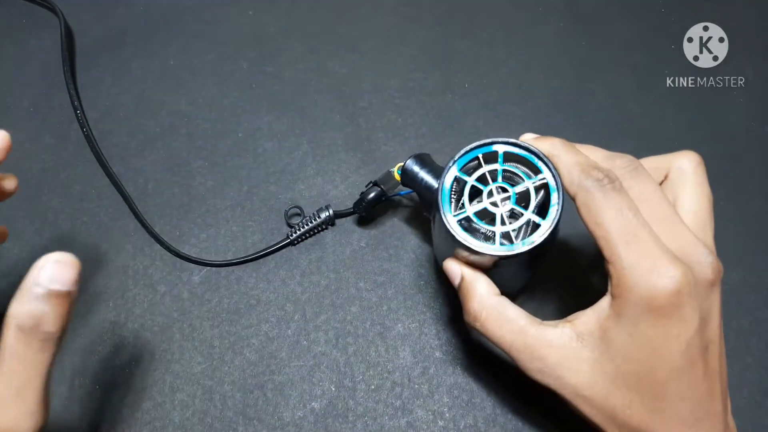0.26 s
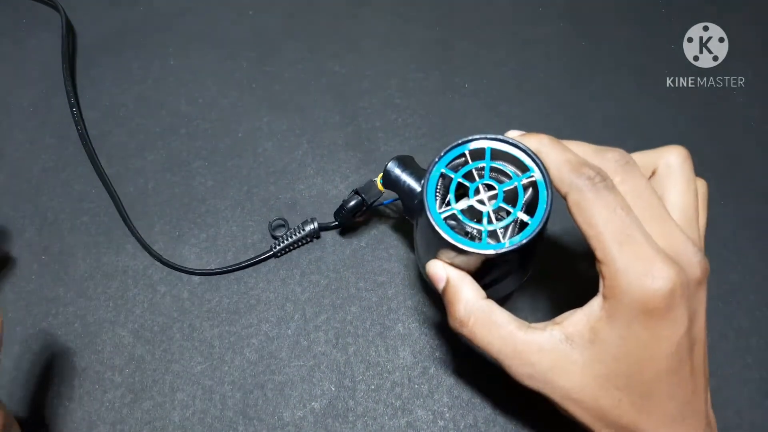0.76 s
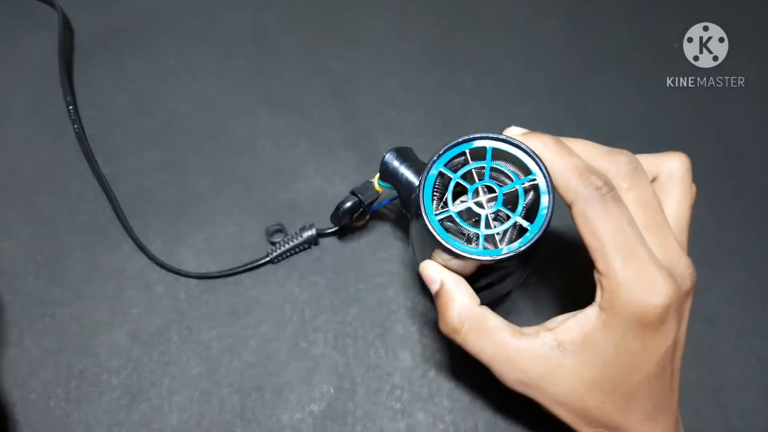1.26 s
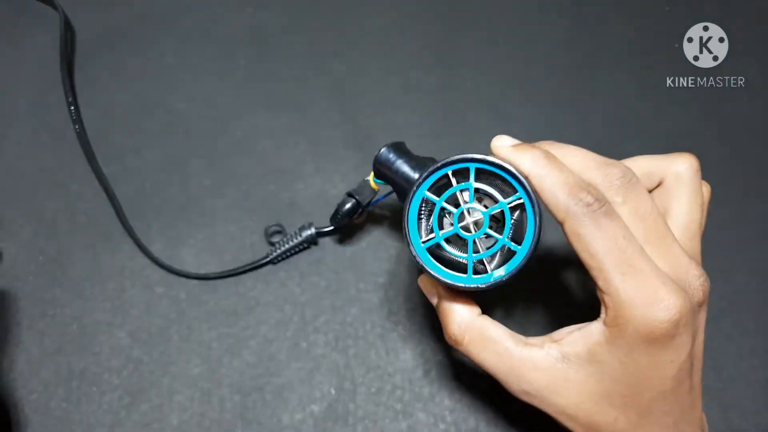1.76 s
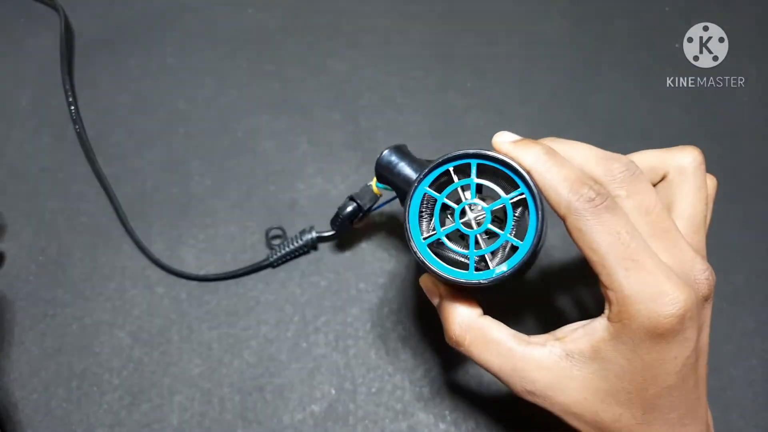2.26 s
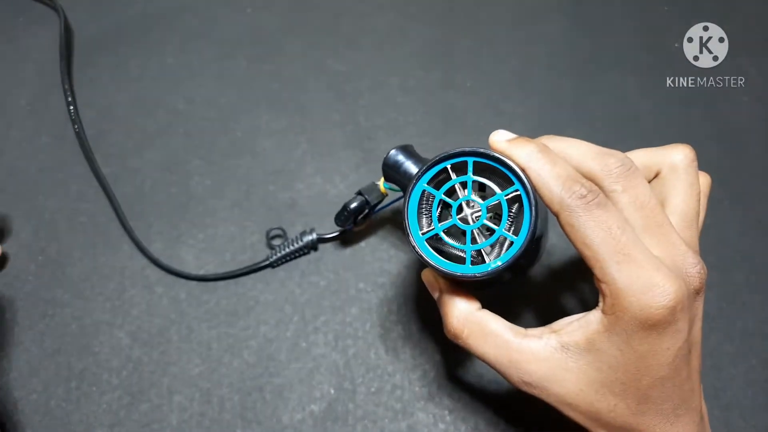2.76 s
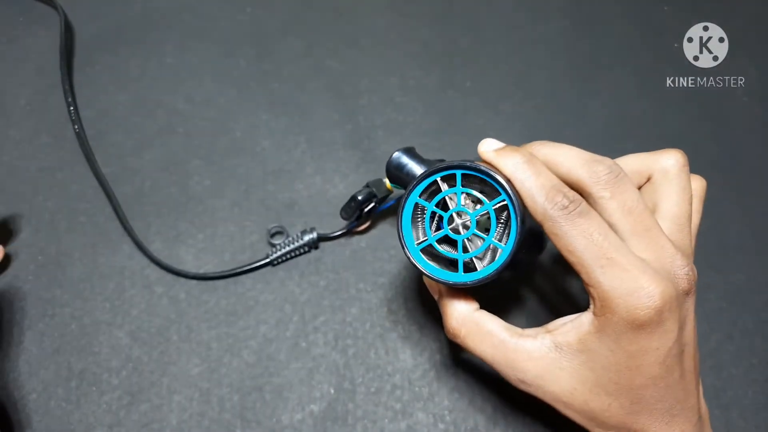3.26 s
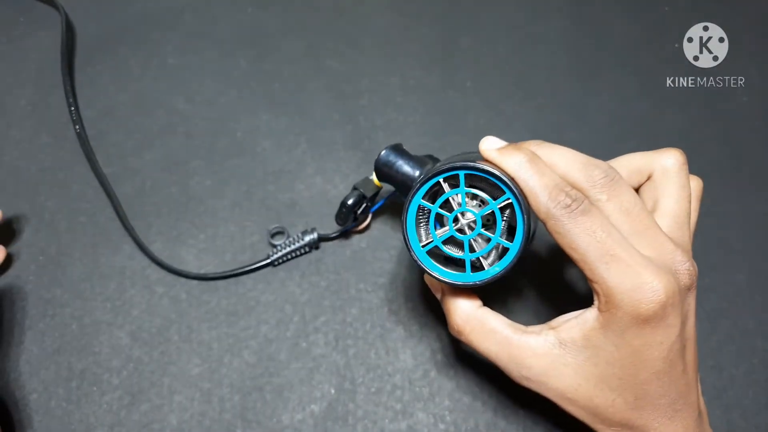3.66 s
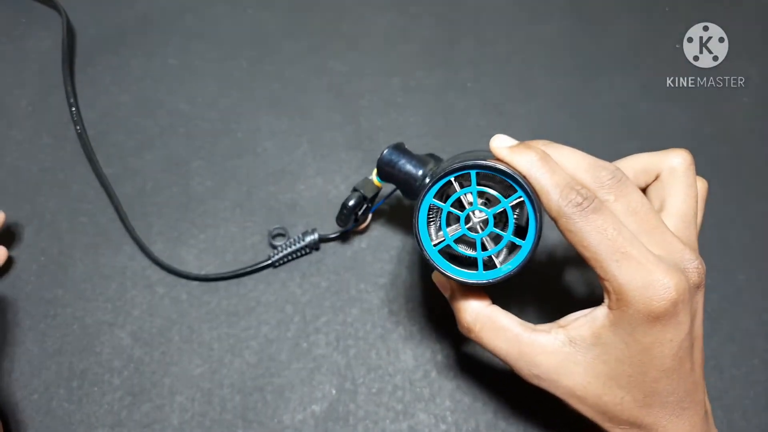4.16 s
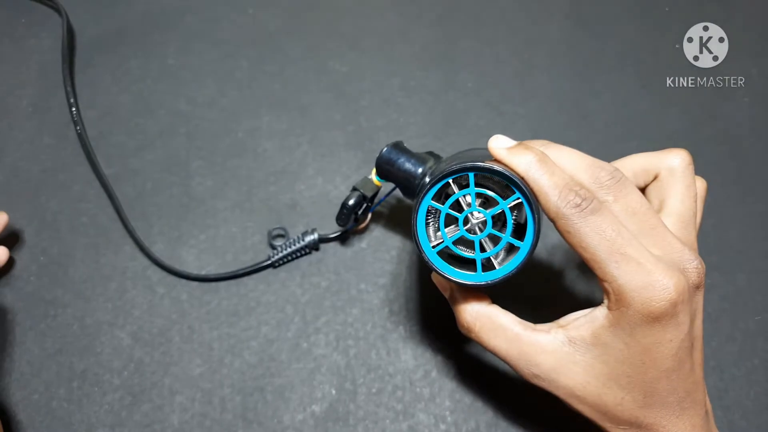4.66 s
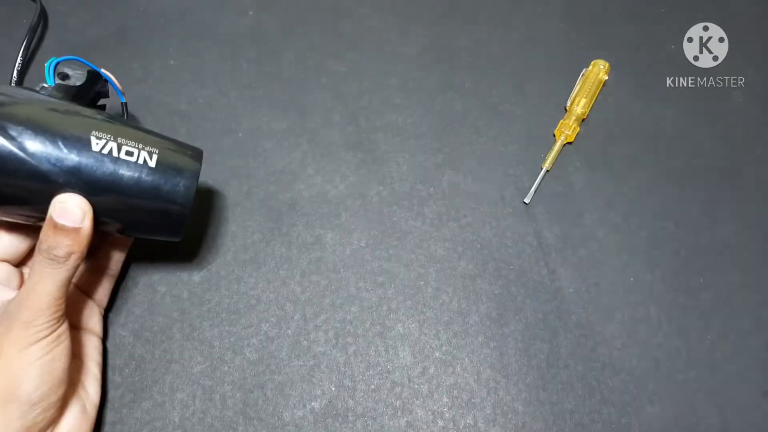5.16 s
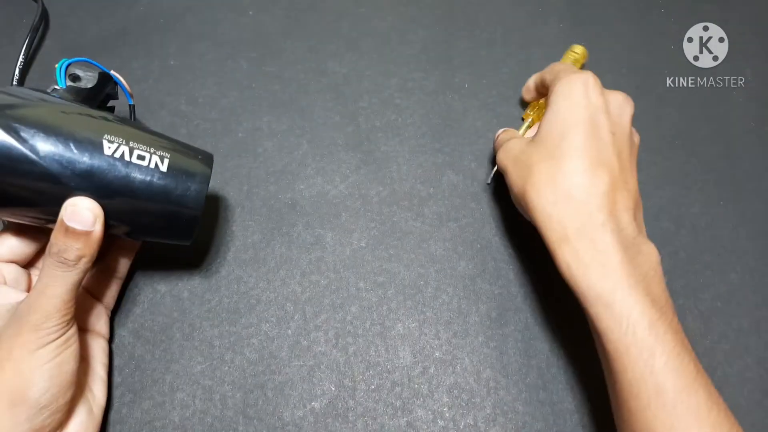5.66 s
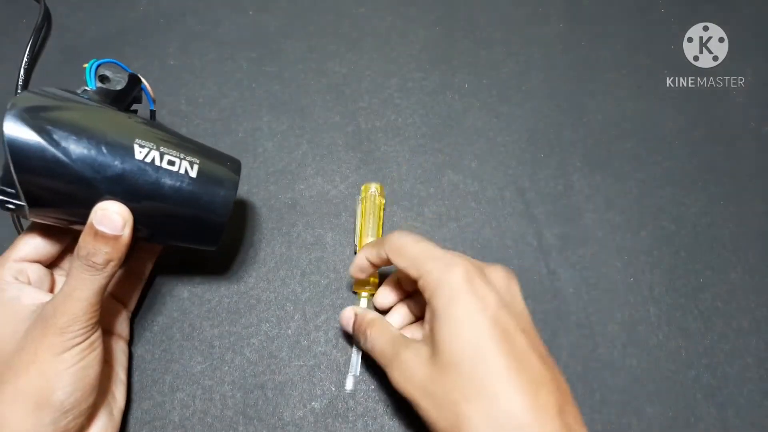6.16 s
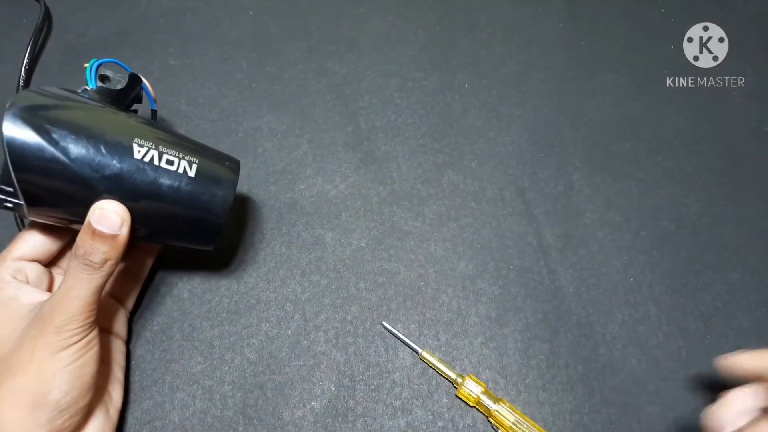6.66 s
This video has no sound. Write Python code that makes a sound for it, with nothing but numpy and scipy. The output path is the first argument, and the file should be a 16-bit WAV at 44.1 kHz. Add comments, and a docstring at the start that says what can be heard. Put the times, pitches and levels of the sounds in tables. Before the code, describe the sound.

A small hair dryer hisses with a faint whine, its jet roaring in blustery left-sided microphone buffeting, then abruptly runs closer and brighter with a soft bump.

```python
"""Brief thumps and gusts strike the left channel, then air hisses over a faint shaft hum and fan whine. A small
hair dryer runs close to a phone: noise shaped by barrel resonances, with tones locked to the fan speed. Stood
nozzle up, it tilts until its jet buffets the left microphone port, and the gain control pulls all down; midway
the jet drifts aside, so that only its flapping edge hits in gusts, then it returns. Then the scene changes: the
dryer lies on its side, nearer and brighter, while a screwdriver bumps softly on the table."""
import sys
import numpy as np
from scipy import signal
from scipy.fft import rfft, irfft, next_fast_len
from scipy.io import wavfile
from scipy.ndimage import uniform_filter1d, minimum_filter1d, map_coordinates

SR = 44100
rng = np.random.default_rng(int(sys.argv[2]) if len(sys.argv) > 2 else 0)


def materialize(psi):
    """Save the field psi as 16-bit PCM at rate SR to the path in sys.argv[1].

    A 1-D psi becomes a single channel; in a 2-D psi each row is a channel.
    """
    bounded = np.clip(np.atleast_2d(psi).T, -1, 1)
    quanta = np.round(bounded * 32767).astype(np.int16)
    wavfile.write(sys.argv[1], SR, quanta)


N = 304731
TIME = np.arange(N) / SR
TURN_S = 5.177  # the scene changes here; from now on the dryer lies on its side

# Loudness of the dryer, nozzle up and on its side: (time [s], level [dB])
LOUDNESS_UPRIGHT = [(0, -38), (.35, -36.5), (1.1, -36.5), (1.6, -30), (2.2, -32), (4.9, -32), (5.17, -29.5)]
LOUDNESS_LYING = [(5.18, -20), (6.9, -23.5)]
# Rotation of the fan, which sags a little while upright: (time [s], speed [turns/s])
FAN_SPEED = [(0, 341.7), (1.4, 342.2), (3.3, 340.1), (5.17, 340.7), (5.18, 343.15)]
# Spectrum of the rushing air, relative to the loudness:
# (frequency [Hz], left level [dB per Hz], right level [dB per Hz])
AIR_UPRIGHT = [(40, -60, -67), (170, -51, -49), (284, -38, -40.5), (620, -40, -41.5), (834, -34, -37.5),
               (1235, -23.5, -25), (1960, -31, -31), (3360, -35, -37), (6330, -36, -40.5),
               (8400, -30, -39.5), (10260, -47, -40), (12300, -42, -38), (15300, -46.5, -45.5)]
AIR_LYING = [(40, -53.5, -59), (163, -45, -51.5), (274, -30, -32), (610, -34, -36.5), (1207, -16.5, -19.5),
             (1900, -27, -31), (3600, -31, -34), (6060, -32.5, -38.5), (8600, -29.5, -38.5),
             (10300, -43.5, -39.5), (12500, -38.5, -37.5), (15300, -46, -45)]
# Resonances and notches of barrel and table top:
# (centre [Hz], width [Hz], left gain [dB], right gain [dB])
BARREL_UPRIGHT = [(100, 25, 8, 8), (948, 39, 7.5, 5), (1044, 51, -7, -8), (1210, 50, 5.5, 0),
                  (1333, 130, 1, 7), (1470, 35, 12, 2), (1660, 110, -3.5, -7.5), (2500, 240, 9, 6),
                  (2760, 110, 2, 2), (3085, 155, 5.5, 4), (4030, 180, 6, 3), (4870, 450, 2, 4.5),
                  (7300, 360, 1.5, -2)]
BARREL_LYING = [(98, 15, 13, 20), (907, 42, -12, -7), (975, 74, 7, 5.5), (1041, 27, 9, -12),
                (1115, 120, 0.5, 4), (1328, 32, -7.5, -10), (1360, 51, 0, -2), (1697, 45, 6.5, -8),
                (2614, 106, 8.5, 3), (2804, 43, 10.5, 1), (2946, 94, 5, 5), (3370, 32, 7, -5),
                (4720, 210, 6, 3.5), (5330, 200, 2.5, 3), (8020, 45, 8, 5), (8560, 45, 5, 6)]
# Shaft hum and six-blade whine, relative to the loudness:
# (multiple of fan speed [1], left level [dB], right level [dB])
TONES_UPRIGHT = [(1, -12.5, -34), (6, -7.5, -9)]
TONES_LYING = [(1, -15.5, -17), (6, -10, -22)]
# Likeness of the air noise at the two ports: (frequency [Hz], coherence [1])
COHERENCE_UPRIGHT = [(100, .3), (300, .6), (800, 0.78), (1200, 0.58), (2300, 0.75), (3600, 0.34),
                     (8000, .33), (11000, 0.073)]
COHERENCE_LYING = [(100, 0.89), (400, 0.65), (1200, 0.51), (1900, 0.79), (2500, 0.083), (7000, 0.093),
                   (14000, .15)]

# Push of the jet on the left port, swinging on, half off, on again and away: (time [s], level [dB])
JET_PUSH = [(0, -21.5), (.25, -61), (1.1, -65), (1.55, -38.5), (1.67, -23.5), (1.695, 1), (1.95, 6),
            (2.35, 3.5), (2.6, -2.5), (3.1, -11.5), (3.37, -11.5), (3.62, 7), (4.5, 4), (4.96, 4),
            (5.06, -13), (5.13, -33)]
# Strongest gusts from the edge of the jet: (time [s], level [dB], half length [s])
EDGE_GUSTS = [(.081, -22, .006), (.206, -30, .006), (2.468, 7, 0.0037), (2.572, 2.5, 0.0054),
              (2.646, 5, 0.0067), (2.69, 5.5, .003), (2.777, 2, 0.0055), (2.859, 1, 0.011),
              (2.93, 2.5, 0.0063), (2.995, 0.5, 0.0082), (3.043, 1, 0.0032), (3.178, -3.5, 0.023),
              (3.327, -3, 0.0067), (3.454, 4, 0.0055), (5.044, -2.5, 0.013)]
# Relative spectra of the buffeting: deep body, splutter of the fastest eddies, and slow air
# curling round a port: (frequency [Hz], level [dB per Hz])
ROAR_SPECTRUM = [(20, -56), (42, -37.5), (65, -9.5), (90, -3.5), (130, -2.5), (170, -3), (240, 0.5),
                 (320, -5), (500, -8.5), (750, -18), (1200, -26.5), (2500, -77)]
SPLUTTER_SPECTRUM = [(150, -30), (400, -0.5), (700, -1), (1000, -5), (1500, -8.5), (2000, -15.5),
                     (3000, -29), (5000, -35.5), (10000, -70)]
DRAUGHT_SPECTRUM = [(25, -33), (55, 1), (85, -0.5), (130, -7.5), (300, -27), (900, -94)]
# Big lone eddies thumping the left port: (time [s], peak level [dB])
BIG_THUMPS = [(.013, -17), (.024, -8), (0.0278, -2), (1.6179, -1), (1.6376, -1)]

# Screwdriver bumping the table: (time [s], level [dB])
TABLE_BUMPS = [(6.22, -19.5), (6.285, -38)]
# Relative spectrum of the table's thud: (frequency [Hz], level [dB per Hz])
THUD_SPECTRUM = [(25, -25), (70, -1), (130, -2), (350, -1), (700, -8), (1500, -40)]


def dryer():
    """Superposition: air noise with its reflections plus fan tones, in two positions one after the other."""
    upright_air = air(AIR_UPRIGHT, BARREL_UPRIGHT, COHERENCE_UPRIGHT, lag_ms=0.043, flutter_db=0.25)
    upright = walls(upright_air) + fan(TONES_UPRIGHT, flicker_db=2)
    lying_air = air(AIR_LYING, BARREL_LYING, COHERENCE_LYING, lag_ms=0.316, flutter_db=0.39)
    lying = walls(lying_air) + fan(TONES_LYING, flicker_db=5)
    upright = amp(curve(LOUDNESS_UPRIGHT)) * upright
    lying = amp(curve(LOUDNESS_LYING)) * lying
    return np.where(TIME < TURN_S, upright, lying)


def air(spectrum, barrel, coherence, lag_ms, flutter_db):
    """Turbulence noise: broadband flow coloured by barrel resonance, reaching the left port first."""
    def port_response(hz):
        gain_db = np.array([along(spectrum, hz, axis=1), along(spectrum, hz, axis=2)])
        for centre, width, left_db, right_db in barrel:
            resonance = 1 / (1 + (2 * (hz - centre) / width) ** 2)
            gain_db = gain_db + np.outer([left_db, right_db], resonance)
        cycles_late = np.outer([0, lag_ms / 1000], hz)
        return amp(gain_db) * np.exp(-2j * np.pi * cycles_late) * np.sqrt(SR / 2)

    def mid_side_response(hz):
        # for mid + side and mid - side, the cosine of twice this angle is the coherence
        angle = np.arccos(np.clip(along(coherence, hz), 0, 1)) / 2
        return np.array([np.cos(angle), np.sin(angle)])

    mid, side = filtered(rng.standard_normal((2, N)), mid_side_response)
    flow = amp(flutter_db * (wobble(12) + wobble(90)))
    return flow * filtered(np.array([mid + side, mid - side]), port_response)


def fan(tones, flicker_db):
    """Rotor tones: shaft and blade-passing rates, their pitch and strength shaken by uneven inflow."""
    speed = curve(FAN_SPEED) * (1 + .0015 * wobble(40))
    angle = 2 * np.pi * np.cumsum(speed) / SR
    out = np.zeros((2, N))
    for multiple, left_db, right_db in tones:
        flicker = amp(flicker_db * wobble(32))
        tone = unit(np.sin(multiple * angle) * flicker)
        out += np.outer(amp([left_db, right_db]), tone)
    return out


def walls(x, wet_db=-11, t60=0.11):
    """Early reflection: quick echoes off the table and nearby walls ripple the spectrum."""
    age = TIME[:SR // 8]
    decay = amp(-60 * age / t60)  # t60 in seconds
    tail = rng.standard_normal((2, len(age))) * decay * (age > .002)
    tail /= np.linalg.norm(tail, axis=1, keepdims=True)
    return x + amp(wet_db) * signal.oaconvolve(x, tail, axes=1)[:, :N]


def push():
    """Shear-layer flapping: the jet is steady within and flaps at its edge, with gusts added in power."""
    edge_db, edge_breadth_db = -6, 8  # push at which the edge lies on the port
    flap_db, flap_knots_per_s = 3, 55
    jet_db = curve(JET_PUSH)
    on_edge = np.exp(-((jet_db - edge_db) / edge_breadth_db) ** 2)
    flow = amp(jet_db + flap_db * on_edge * wobble(flap_knots_per_s))
    gusts = sum(amp(db) ** 2 * swell(s, half_s) for s, db, half_s in EDGE_GUSTS)
    return 10 * np.log10(flow ** 2 + gusts)


def buffet(push_db, splutter_db=-14, roar_swing_db=1.92, splutter_swing_db=5.5, draught_db=-10):
    """Eddy scaling: a harder push on the ports breaks into smaller, brighter eddies."""
    swirl = unit(wobble(420) + 0.4 * wobble(90))
    roar = opened(coloured_noise(ROAR_SPECTRUM, roar_swing_db * swirl), push_db)
    splutter = coloured_noise(SPLUTTER_SPECTRUM, splutter_swing_db * np.minimum(swirl, 2))
    splutter = splutter * amp(splutter_db + push_db / 2)
    # the slow curl grows less steeply, so it is all that remains of a weak push
    draught = amp(draught_db + 0.64 * push_db) * coloured_noise(DRAUGHT_SPECTRUM, 0)
    left = amp(push_db) * (roar + splutter) + draught
    return np.array([left, spill()]) * (TIME < TURN_S)


def opened(roar, push_db):
    """Velocity dependence: a weak push stirs only slow eddies, a hard one restores the roar's top."""
    dull_hz, open_db, open_breadth_db = 410, -6, 2.5
    dull = filtered(roar, lambda hz: 1 / (1 + (hz / dull_hz) ** 6))
    share = 1 / (1 + np.exp((open_db - push_db) / open_breadth_db))
    return dull + share * (roar - dull)


def spill():
    """Jet spreading: slow air brushes the right port once as the dryer tips over."""
    level_db, unevenness_db = -34, 1
    strength = amp(level_db + unevenness_db * wobble(12)) * swell(4.6, half_length=0.32)
    return strength * coloured_noise(DRAUGHT_SPECTRUM, 0)


def pops(push_db):
    """Pressure dipole: each lone eddy pushes the left membrane, then pulls it; small ones grow with the jet."""
    pops_per_s, pop_db, scatter_db = 9, 8.5, 2  # peak of a pop is relative to the push
    pop_half_s, thump_half_s = 0.0003, 0.00084
    chance = rng.standard_normal((int(pops_per_s * TURN_S), 2))
    times = (np.arange(len(chance)) + chance[:, 0]) / pops_per_s % TURN_S
    sizes_db = np.interp(times, TIME, push_db) + pop_db + scatter_db * chance[:, 1]
    small = [(s, db, pop_half_s) for s, db in zip(times, sizes_db)]
    big = [(s, db, thump_half_s) for s, db in BIG_THUMPS]
    out = np.zeros((2, N))
    for s, db, half_s in big + small:
        near = slice(*np.searchsorted(TIME, [s - 10 * half_s, s + 10 * half_s]))
        u = (TIME[near] - s) / half_s
        out[0, near] -= amp(db) * u * np.exp(.5 * (1 - u ** 2))  # extremes at u = -1 and 1
    return out


def bumps(t60=0.25, attack=0.0024):
    """Impact and damped decay: soft, dull knocks travel through the table top."""
    blows = np.zeros(N)
    for s, db in TABLE_BUMPS:
        age = np.maximum(TIME - s, 0)
        decay = np.exp(-np.log(1000) * age / t60)  # t60 and attack in seconds
        blows += amp(db) * decay * (1 - np.exp(-age / attack))
    return blows * coloured_noise(THUD_SPECTRUM, 0)


def coloured_noise(spectrum, swing_db):
    """Spectral shaping: white noise of swinging strength is filtered, then set to rms 1."""
    noise = amp(swing_db) * rng.standard_normal(N)
    return unit(filtered(noise, lambda hz: amp(along(spectrum, hz))))


def filtered(x, response):
    """Linear filtering: the spectrum of x is multiplied by a response of frequency."""
    size = next_fast_len(N + SR // 4)
    hz = np.fft.rfftfreq(size, 1 / SR)
    return irfft(rfft(x, size) * response(hz), size)[..., :N]


def along(points, hz, axis=1):
    """Logarithmic pitch scale: one column of a spectrum table is interpolated in log frequency."""
    columns = np.transpose(points)
    return np.interp(np.log(hz + 1), np.log(columns[0] + 1), columns[axis])


def curve(rows):
    """Linear interpolation: (time, value) rows become one value per sample."""
    return np.interp(TIME, *np.transpose(rows))


def wobble(rate):
    """Band-limited fluctuation: a smooth curve passes through rate random knots a second."""
    return map_coordinates(rng.standard_normal(int(N * rate / SR) + 4), [TIME * rate])


def swell(s, half_length):
    """Gaussian envelope: a bell-shaped rise and fall round the time s."""
    return np.exp(-np.minimum(((TIME - s) / half_length) ** 2, 60))


def amp(db):
    """Logarithmic level: decibels become an amplitude ratio."""
    return 10 ** (np.asarray(db) / 20)


def unit(x):
    """Root-mean-square normalization: x is scaled to rms 1."""
    return x / np.sqrt(np.mean(x ** 2) + 1e-20)


def scene():
    """Superposition: the dryer, its jet on the microphone, and the table add linearly."""
    push_db = push()
    return dryer() + buffet(push_db) + pops(push_db) + bumps()


def turn_down(x, ceiling_db, range_db, recovery_db_per_s):
    """Gain reduction: peaks over the ceiling lower both channels at once, and the gain creeps back."""
    peak_db = 20 * np.log10(np.abs(x).max(axis=0) + 1e-9)
    needed_db = minimum_filter1d(np.clip(ceiling_db - peak_db, -range_db, 0), size=129)
    creep_db = recovery_db_per_s * TIME
    gain_db = np.minimum.accumulate(needed_db - creep_db) + creep_db
    return x * amp(uniform_filter1d(gain_db, size=129))


def record(dry, overload_db=15, low_cut_hz=40, top_hz=15550):
    """Saturation: the microphone rounds off blasts; slow gain control, limiter and band limits follow."""
    rounded = dry / (1 + np.square(np.square(dry / amp(overload_db)))) ** (1 / 4)
    levelled = turn_down(rounded, ceiling_db=-0.5, range_db=11.5, recovery_db_per_s=2.0)
    limited = turn_down(levelled, ceiling_db=-1.5, range_db=30, recovery_db_per_s=19.5)

    def band(hz):
        low_cut = hz ** 2 / np.hypot(hz ** 2, low_cut_hz ** 2)
        return low_cut * (hz < top_hz)

    return filtered(limited, band)


dry = scene()
out = record(dry)
materialize(out)
```